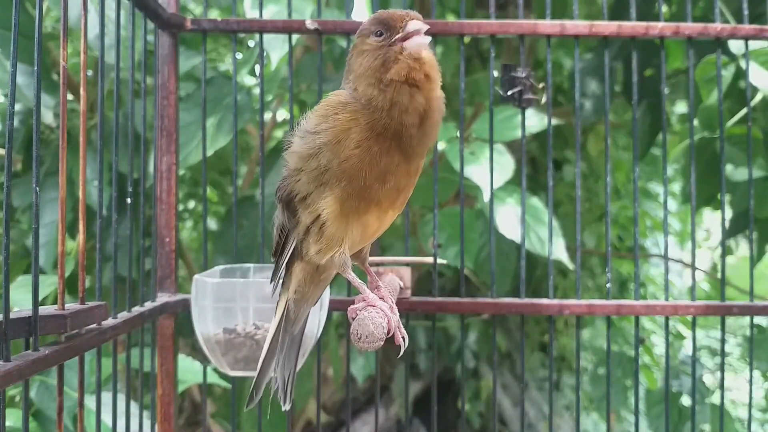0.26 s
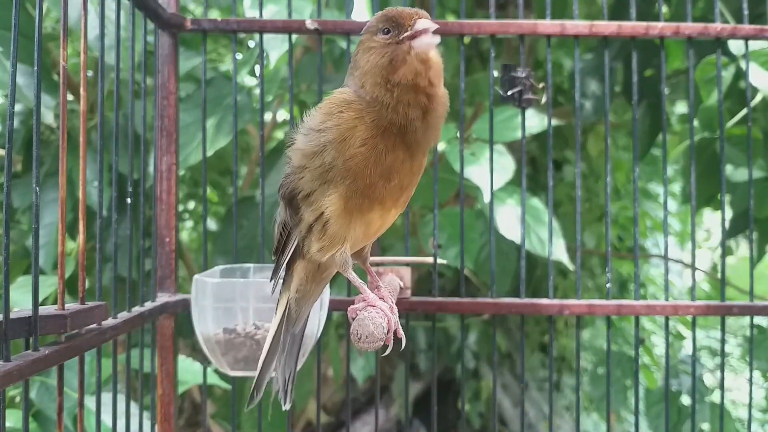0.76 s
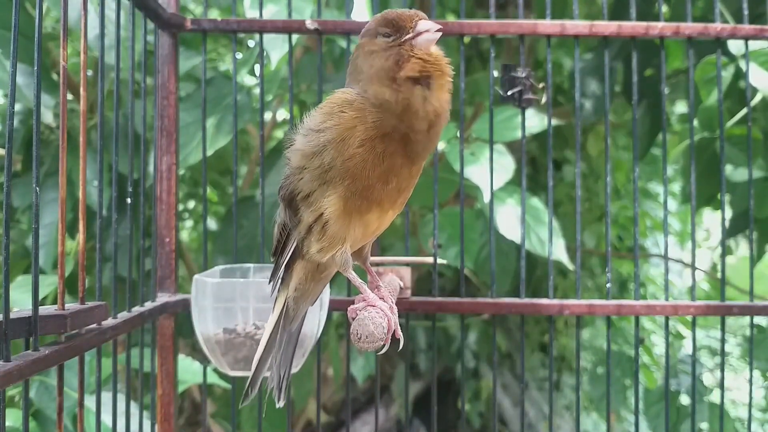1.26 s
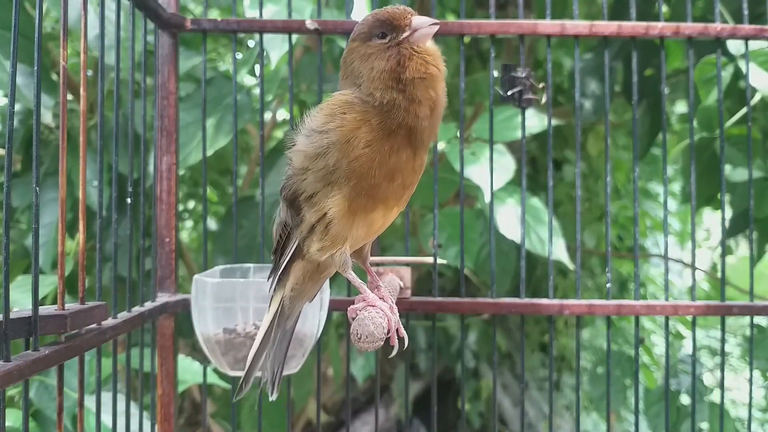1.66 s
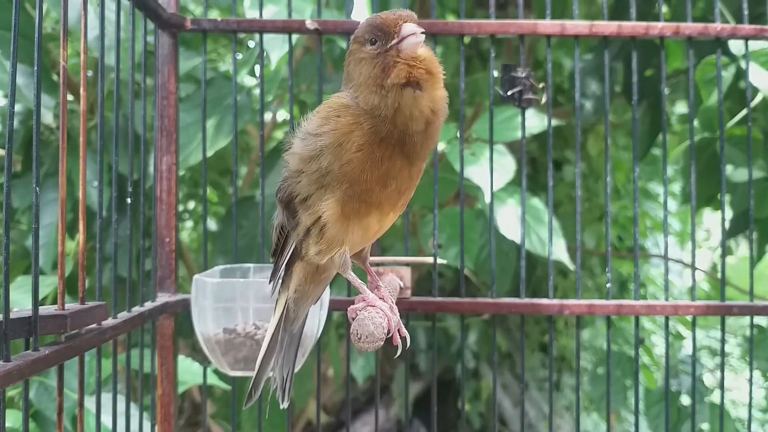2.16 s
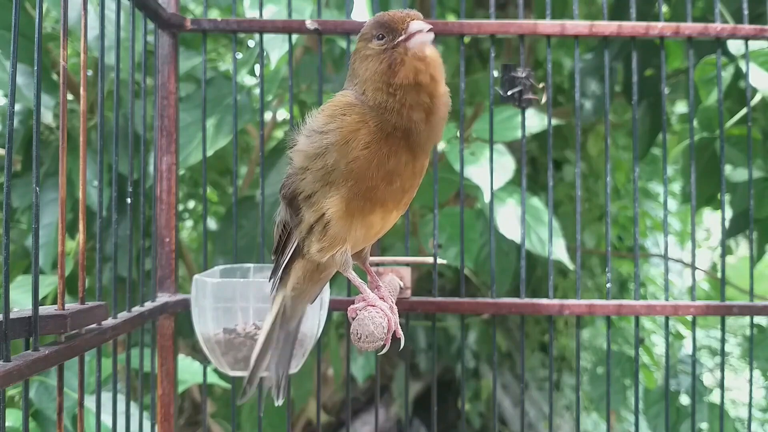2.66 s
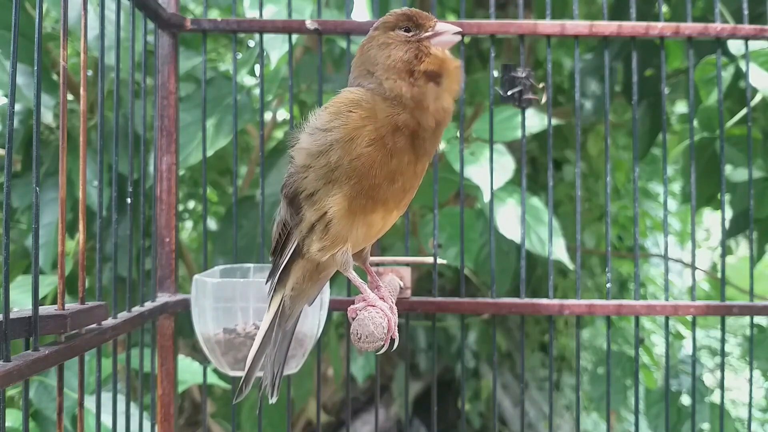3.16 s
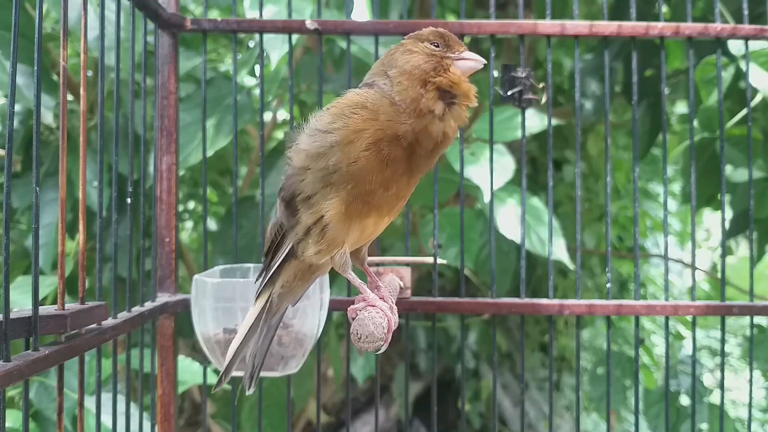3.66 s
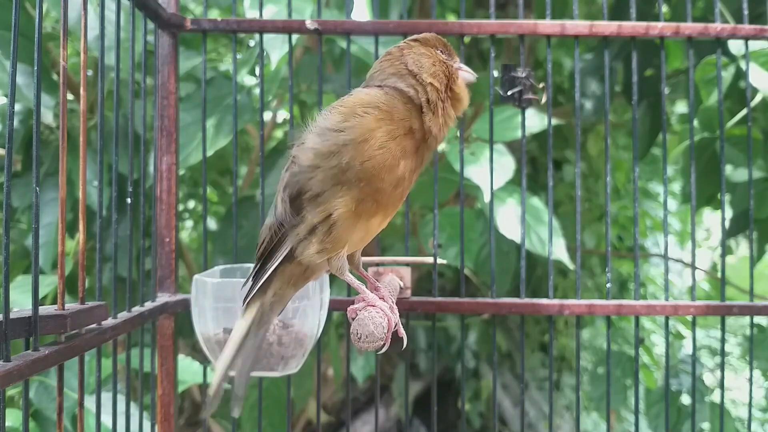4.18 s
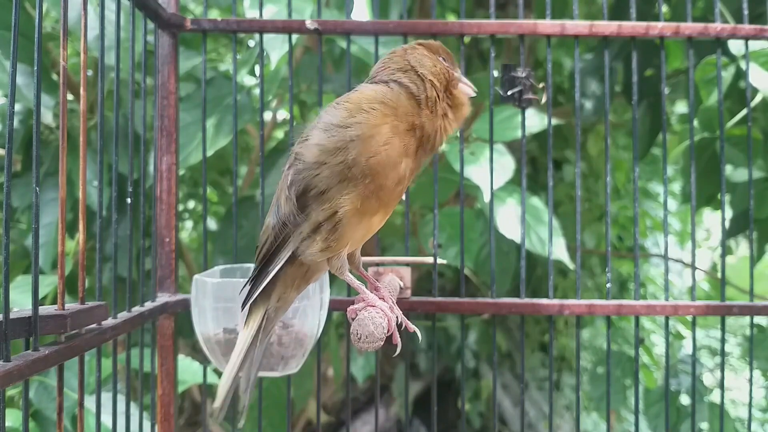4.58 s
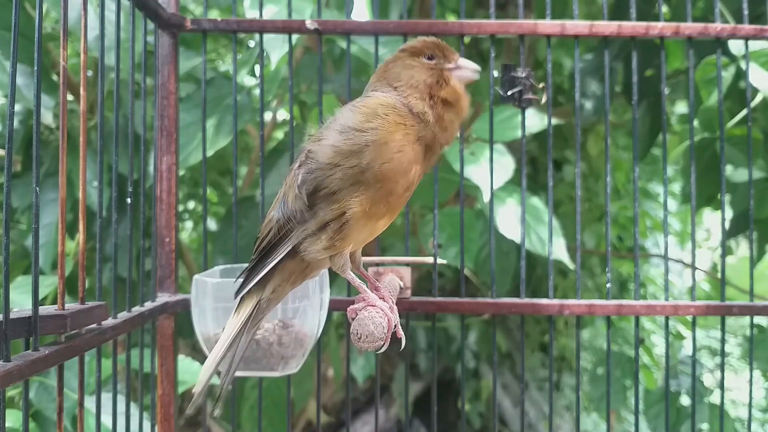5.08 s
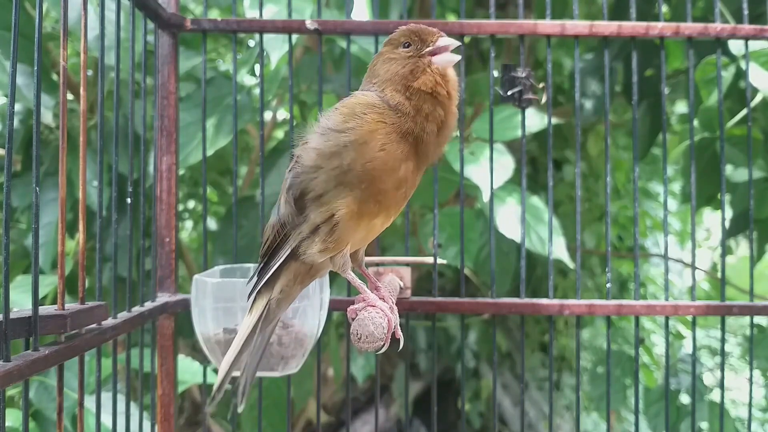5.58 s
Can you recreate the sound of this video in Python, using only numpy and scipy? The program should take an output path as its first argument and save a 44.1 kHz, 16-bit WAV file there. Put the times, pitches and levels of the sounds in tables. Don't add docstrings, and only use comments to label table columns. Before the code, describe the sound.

Close, bright, piercing birdsong from one canary: repeated whistles dropping quickly from high to a steady lower pitch, then two rapid trills of sharp falling chirps at about sixteen strokes per second, then six low-high pairs. Only tiny gaps separate the notes. The outdoor space has tight reflections from cage and walls; underneath are a quiet traffic wash, low engine pulses, and barely audible knocks and other birds. Peaks sound a little strained.

```python
import sys
import numpy as np
from scipy import signal
from scipy.fft import rfft, irfft, next_fast_len
from scipy.io import wavfile
from scipy.ndimage import uniform_filter1d, minimum_filter1d

SR = 44100
rng = np.random.default_rng(int(sys.argv[2]) if len(sys.argv) > 2 else 0)


def persist_wave(psi):
    counts = np.round(np.clip(psi, -1, 1) * 32767).astype(np.int16)
    wavfile.write(sys.argv[1], SR, np.atleast_2d(counts).T)


def how_loud(loudness_db):
    steps = np.asarray(loudness_db, float) / 20
    return 10 ** steps


N = 257103

# [t/s, level/dB]
STREET_LEVEL = [(0.0, -48), (0.03, -44), (0.57, -51.5), (0.62, -45), (1.33, -45), (1.54, -52.5),
                (1.64, -45.5), (3.95, -45.5), (4.09, -39), (4.45, -45.5), (5.39, -45.5), (5.41, -52.5),
                (5.75, -43), (5.83, -50.5)]
# [f/Hz, level/dB per Hz]
AIR_SPECTRUM = [(15, -56), (35, -31), (60, -14), (107, 2), (286, -7.5), (450, -13.5), (749, -24),
                (1350, -34), (2200, -35), (4000, -31), (6500, -38), (8800, -35), (12000, -51), (16000, -65)]
# [t of the loudest moment/s, level/dB, width/s]
ENGINE_THROBS = [(.13, -45, 0.34), (.68, -35, 0.063), (0.962, -29, 0.14), (1.279, -24, .09),
                 (1.652, -30.5, 0.11), (1.93, -31, 0.028), (2.089, -25.5, 0.051), (2.32, -32, 0.26),
                 (2.83, -31, 0.1), (3.15, -38.5, 0.27), (3.44, -34, 0.26), (3.73, -41, 0.044),
                 (3.92, -27.5, 0.12), (4.2, -49.5, 0.24), (4.611, -31.5, 0.088), (4.85, -42, 0.45),
                 (5.31, -29.5, .07), (5.72, -29.5, .15)]
# [t/s, length/s, f/Hz, level/dB]
FAR_KNOCKS = [
    (0.059, 0.084, 990, -48),
    (1.46, 0.11, 980, -51.5),
    (2.006, 0.14, 1060, -54.5),
    (4.383, 0.066, 960, -45),
    (4.701, 0.08, 1020, -49),
    (5.22, 0.11, 1040, -57.5),
]
# [delay/ms, gain]
EARLY_ECHOES = [(1.654, 0.16), (1.955, 0.09), (2.258, 0.08), (2.534, 0.14), (3.016, 0.19), (3.46, 0.17),
                (3.992, 0.16), (4.242, 0.1), (4.593, 0.09), (4.85, 0.08), (5.763, 0.09), (7.361, 0.06),
                (9.271, 0.09), (9.872, 0.05), (10.652, 0.04), (11.101, 0.05), (12.668, 0.04),
                (14.448, 0.05)]
# [t/s, length/s, start f/Hz, end f/Hz, level/dB]
FAR_SLIDES = [
    (2.07, .05, 3000, 4200, -42),
    (2.09, .04, 7200, 8400, -54),
    (1.52, .04, 4300, 3800, -44),
    (.485, .06, 5100, 3850, -43),
    (4.14, .07, 8200, 7800, -52),
    (4.06, .05, 4300, 3900, -42),
]
# [t/s, length/s, start f/Hz, end f/Hz, level/dB]
FAR_ARCHED_CALLS = [
    (3.06, .065, 4950, 4000, -46),
    (1.98, .07, 5050, 4500, -44),
    (2.42, .055, 5000, 4500, -44),
    (1.165, .11, 3700, 3400, -42),
    (.25, .04, 4700, 4300, -48),
]
# [t/s, f/Hz, level/dB]
FAR_MACHINE = [(1.5, 770, -76), (1.65, 755, -61), (1.8, 775, -82), (2.1, 763, -66), (2.3, 770, -64),
               (2.5, 760, -84)]
# [multiple of the pitch, level/dB]
VOICE_OVERTONES = [(2, -34), (3, -36.5), (4, -33)]
# [t/s, length/s, held f/Hz, slowness of the fall, level at the end of the hold/dB]
WHISTLES = [
    (.0004, 0.22, 3135, 0.86, -9.5),
    (0.2886, 0.22, 3140, 0.85, -10),
    (0.58, 0.24, 3696, 0.77, -7.5),
    (0.8646, 0.24, 3658, 0.95, -7),
    (1.171, 0.25, 3665, 0.87, -9),
    (1.4755, 0.26, 3628, 0.95, -10.5),
    (1.794, 0.27, 3621, .955, -5.5),
    (2.1203, 0.27, 3641, 0.96, -8),
    (2.4491, 0.26, 3588, 0.97, -8.5),
    (2.7737, 0.27, 3593, 1.026, -8.5),
]
# [t/s, share of the way from held pitch to top]
WHISTLE_RISE = [(0, .6), (.003, .83), (.006, .93), (.0115, .998)]
# [t/s, share of the way from held pitch to top]
WHISTLE_FALL = [(0, 1), (.008, .936), (.021, .74), (.06, .455), (.1, .165), (.12, .066), (.142, .023),
                (.17, .003), (.27, -.011)]
# [t after onset/s, level/dB, extra level of deeper whistles/dB]
WHISTLE_EFFORT = [(0, -19.5, -9), (.003, -20.5, 7), (.01, -12.5, -1.5), (0.028, -10, -8.5),
                  (0.068, -7.5, 2), (0.113, -10.5, -8), (0.153, -4, 0.5)]
# [t after onset/s, extra f/Hz]
DEEP_SETTLING = [(.1, 0), (.13, 135), (.16, 25), (.19, -55), (.24, 10)]
# [t/s, f/Hz, level/dB]
TRILL_OPENING = [(3.113, 5310, -21), (3.117, 6500, -29), (3.124, 7260, -38), (3.13, 6630, -22.5),
                 (3.138, 5040, -16.5), (3.144, 3870, -1), (3.152, 3190, -39), (3.164, 2590, -18),
                 (3.166, 2300, -48)]
# [t/s, slowness, chip level/dB, arc level/dB]
FIRST_TRILL = [(3.1824, 0.99, -18, -2.5), (3.245, 0.94, -13, -2), (3.3053, 0.92, -11.5, -1),
               (3.365, 0.91, -9, -1), (3.4249, 0.92, -10.5, -0.5), (3.4844, 0.99, -7.5, -1.5),
               (3.5474, 0.91, -18, 0), (3.6078, 0.94, -10.5, -2), (3.669, 1.02, -10.5, -.5),
               (3.732, .95, -7, -2), (3.7938, 0.99, -12, -1), (3.8575, 0.97, -10, 0),
               (3.92, 1.02, -11.5, -3.5), (3.9851, 1.046, -24.5, -2)]
# [t after onset/s, f/Hz, level/dB]
CHIP_SHAPE = [(-.001, 3500, -47), (.0008, 4000, -11.5), (.002, 4494, 11.5), (.0035, 5230, -9),
              (.006, 6120, -8)]
# [t after onset/s, f/Hz, level/dB]
ARC_SHAPE = [(.005, 5887, -47), (.0085, 6803, -27), (.013, 6450, -19), (.02, 5422, -12.5), (.03, 3920, -2),
             (.034, 3417, -14), (.039, 3238, -19), (.0445, 2850, -7.5), (.052, 2114, -31)]
# [t/s, slowness, start f/Hz, level/dB]
SECOND_TRILL = [(4.1016, 0.85, 6570, -4.5), (4.1604, 0.88, 6720, 1), (4.2204, 0.98, 6730, 0),
                (4.2785, 1.05, 6970, -0.5), (4.342, 0.96, 6940, -0.5), (4.403, 1.02, 6900, -1),
                (4.4651, 0.9, 6580, 0.5), (4.5247, 1, 6810, -.5), (4.5873, .97, 6980, 0.5),
                (4.6505, 0.92, 6840, -1.5), (4.7125, 1.02, 6640, -1), (4.7745, 1.11, 6930, -2)]
# [t after onset/s, share of the start pitch, level/dB]
STROKE_UPPER = [(0, 1.015, -30), (.002, 1.0, -17), (.008, .89, -14), (.016, .76, -23)]
# [t after onset/s, f/Hz, level/dB]
STROKE_LOWER = [(0.0208, 4724, -7.5), (.024, 4010, -0.5), (.027, 3526, -10), (.03, 3054, -20),
                (0.032, 3260, -38)]
# [t/s, low note level/dB, high note f/Hz, t of its loudest moment after onset/s, its level/dB]
CLOSING_PAIRS = [
    (4.845, -4, 6377, 0.099, -2.5),
    (5.017, -0.5, 6380, 0.11, -5.5),
    (5.187, 0.5, 6283, 0.12, -5.5),
    (5.358, 1, 6187, 0.12, -4.5),
    (5.527, 0.5, 6204, .116, -6),
    (5.701, 0.5, 6184, 0.12, -3),
]
# [t after onset/s, f/Hz, level/dB]
LOW_NOTE_SHAPE = [(0, 3260, -32), (.006, 3480, -14), (.012, 3610, -5.5), (.021, 3670, -6), (.033, 3680, -9),
                  (.05, 3650, -18), (.078, 3610, -24), (.088, 3600, -36)]
# [t after onset/s, f/Hz, level/dB]
HOARSE_VOICE = [(.025, 4100, -48), (.045, 4550, -41), (.07, 4700, -42), (.095, 4400, -50)]
# [t from 0.055 s after the pair's onset/s, f/Hz, level/dB]
RISE_TO_HIGH = [(-.024, 3900, -46), (-.016, 4350, -39), (-.007, 5050, -39), (0, 5700, -37)]
# [f off its pitch/Hz, level off its peak/dB]
HIGH_NOTE_SHAPE = [
    (-650, -30),
    (-260, -33.5),
    (-89.5, -8),
    (22, 2.5),
    (49, -23),
    (-170, 1),
]


def at_hz(points, hz):
    table = np.array(points)
    return np.interp(np.log(hz), np.log(table[:, 0]), table[:, 1])


def shaped(x, gain):
    size = next_fast_len(N + SR // 2)
    hz = np.arange(size // 2 + 1) * SR / size + 1e-3
    return irfft(rfft(x, size) * gain(hz), size)[..., :N]


def band(x, hz, kind, order=2):
    return signal.sosfilt(signal.butter(order, hz, kind, fs=SR, output="sos"), x)


def drift(rate):
    r = np.exp(-2 * np.pi * rate / SR)
    slow = signal.lfilter([1], [1, -2 * r, r * r], rng.standard_normal(N + SR))[SR:]
    return slow / slow.std()


def unsteady(depth, rate):
    breath = band(rng.standard_normal(N), 4000, "high")
    return np.array([depth * drift(rate), drift(570), drift(230), breath])


def add_note(out, s, hz, db, waver, fade_s=.002):
    at = np.arange(max(0, round(s[0] * SR)), min(N, round(s[-1] * SR)))
    t = at / SR
    pitch_waver, rasp, flutter, breath = waver[:, at]
    pitch = np.interp(t, s, hz) * (1 + pitch_waver)
    phase = 2 * np.pi * np.cumsum(uniform_filter1d(pitch, size=45)) / SR
    tone = (1 + how_loud(-34.5) * rasp) * np.sin(phase) + how_loud(-49) * breath
    closing_db = -.004 * np.maximum(pitch - 3900, 0)
    upper = 0
    for k, overtone_db in VOICE_OVERTONES:
        strength = how_loud(overtone_db + (k > 2) * closing_db)
        upper = upper + strength * (k * pitch < 16000) * np.sin(k * phase)
    tone += (1 + .45 * flutter) * upper
    edge = np.clip(np.minimum(t - s[0], s[-1] - t) / fade_s, 0, 1)
    out[at] += np.sqrt(2) * how_loud(np.interp(t, s, db)) * edge * tone


def engine():
    t = np.arange(N) / SR
    hum_hz = 84 + 3.0 * drift(5)
    hum = np.sin(2 * np.pi * np.cumsum(hum_hz) / SR) * how_loud(3.0 * drift(13))
    throb = how_loud(-58)
    for top, db, width in ENGINE_THROBS:
        throb = throb + how_loud(db) / np.cosh(2.15 * (t - top) / width)
    return throb * hum


def traffic():
    s, street_db = np.transpose(STREET_LEVEL)
    air = shaped(rng.standard_normal((2, N)), lambda hz: how_loud(at_hz(AIR_SPECTRUM, hz)))
    air /= band(air[0], [130, 600], "band").std()
    level_db = np.interp(np.arange(N) / SR, s, street_db) + 1.2 * drift(15) + 1.5 * drift(3)
    return how_loud(level_db) * (air[0] + how_loud(-44) * air[1] * [[1], [-1]])


def knocks():
    t = np.arange(N) / SR
    white, out = rng.standard_normal(N), np.zeros(N)
    for start, length, hz, db in FAR_KNOCKS:
        ring = band(white, [0.82 * hz, 0.98 * hz], "band", order=1)
        out += how_loud(db + 23) * ring * np.sin(np.pi * np.clip((t - start) / length, 0, 1))
    return out


def yard(x):
    def echo_gain(hz):
        return 1 + sum(g * np.exp(-2j * np.pi * hz * ms / 1000) for ms, g in EARLY_ECHOES)

    t = np.arange(SR // 2) / SR

    def tail(t60_s, db, end_s=1):
        decay = (t > .005) * (t < end_s) * how_loud(-60 * t / t60_s)
        return how_loud(db) * decay / np.sqrt(np.sum(decay ** 2))

    near = tail(0.089, -21, end_s=.016)
    walls, far = tail(0.15, -13), tail(0.92, -32.5)
    white = rng.standard_normal((2, len(t)))
    dull = band(white, 4500, "low")
    mid, side = signal.fftconvolve(x[None], (near + walls) * white + far * dull, axes=1)[:, :N]
    return shaped(x, echo_gain) + mid + how_loud(-16.0) * side * [[1], [-1]]


def far_birds():
    out, waver = np.zeros(N), unsteady(0.017, 80)
    for calls, arch_hz in ((FAR_SLIDES, 0), (FAR_ARCHED_CALLS, 470)):
        for s, length, start_hz, end_hz, db in calls:
            hz = [start_hz, (start_hz + end_hz) / 2 + arch_hz, end_hz]
            add_note(out, s + length * np.array([0, .5, 1]), hz, db + np.array([-4, 0, -5]), waver, .01)
    add_note(out, *np.transpose(FAR_MACHINE), waver)
    return out


def trill_breath():
    hiss = band(rng.standard_normal(N), (10800, 14500), "band")
    swell = np.interp(np.arange(N) / SR, (3.17, 3.25, 3.93, 4.03), [0, 1, 1, 0])
    return how_loud(-41 + 2.0 * drift(30)) * swell * hiss


def whistles(waver):
    lag, share = np.transpose(WHISTLE_FALL)
    rise, rise_share = np.transpose(WHISTLE_RISE)
    when, effort_db, deep_db = np.transpose(WHISTLE_EFFORT)
    top_hz, release_s, release_db = 6968, .017, -25
    out = np.zeros(N)
    for s, length, held_hz, slow, end_db in WHISTLES:
        t, deep = np.arange(0, length, .002), held_hz < 3400
        fall = .1 * length + slow * lag
        height = np.interp(t, np.r_[rise, fall], np.r_[rise_share, share])
        hz = held_hz + (top_hz - held_hz) * height + deep * np.interp(t, *np.transpose(DEEP_SETTLING))
        db = effort_db + deep * deep_db
        last = length - release_s
        hold_db = db[-1] - 1 + .25 * (end_db - db[-1])
        db_times = np.r_[when, (when[-1] + last) / 2, last, length]
        db = np.interp(t, db_times, np.r_[db, hold_db, end_db, release_db])
        add_note(out, s + t, hz, db, waver, .001)
    return out


def trills(waver):
    out = np.zeros(N)
    chance_db = 2.5
    chip, arc = np.transpose(CHIP_SHAPE), np.transpose(ARC_SHAPE)
    up, low = np.transpose(STROKE_UPPER), np.transpose(STROKE_LOWER)
    for s, slow, chip_db, arc_db in FIRST_TRILL:
        add_note(out, s + chip[0], chip[1], chip[2] + chip_db, waver, .0005)
        db = arc[2] + arc_db + rng.normal(0, chance_db, len(arc[2]))
        add_note(out, s + slow * arc[0], arc[1], db, waver, .001)
    for s, slow, start_hz, db in SECOND_TRILL:
        lag = np.r_[up[0], low[0]]
        hz = np.r_[up[1] * start_hz, low[1]]
        stroke_db = np.r_[up[2], low[2]] + db + rng.normal(0, chance_db / 2, len(lag))
        add_note(out, s + slow * lag, hz, stroke_db, waver, .001)
    return out


def closing_notes(waver):
    out = np.zeros(N)
    low, haze = np.transpose(LOW_NOTE_SHAPE), np.transpose(HOARSE_VOICE)
    off_hz, off_db = np.transpose(HIGH_NOTE_SHAPE)
    link = np.transpose(RISE_TO_HIGH)
    start_s, end_s = .05, .138
    for k, (s, low_db, high_hz, loudest, high_db) in enumerate(CLOSING_PAIRS):
        add_note(out, s + low[0], low[1], low[2] + low_db, waver, .003)
        add_note(out, s + haze[0], haze[1], haze[2], waver * [[14], [30], [1], [1]], .008)
        swell = start_s + (loudest - start_s) * np.array([0, .17, .45, 1])
        lag = np.r_[swell, loudest + .6 * (end_s - loudest), end_s]
        add_note(out, s + lag, high_hz + off_hz, high_db + off_db, waver, .004)
        if k > 0:
            add_note(out, s + .055 + link[0], link[1], link[2] - 5, waver * [[5], [12], [1], [1]])
    return out


def canary():
    opening, waver = np.zeros(N), unsteady(0.006, 180)
    add_note(opening, *np.transpose(TRILL_OPENING), waver, .004)
    husky = waver * [[1], [2.0], [1], [how_loud(15)]]
    return opening + whistles(waver) + trills(husky) + closing_notes(waver)


def scene():
    street = engine() + traffic() + knocks()
    return street + yard(far_birds() + canary()) + trill_breath()


def low_pass(x):
    return signal.sosfilt(signal.butter(12, 15800, fs=SR, output="sos"), x)


def record(dry):
    turn = 2 * np.pi * 3900 * np.arange(N) / SR
    ripple = how_loud(-27) * np.cos(turn) + how_loud(-40) * np.cos(2 * turn)
    below = band(band(dry, 5000, "high", order=1) * ripple, [900, 3300], "band", order=1)
    above = how_loud(-4) * band(band(dry, 5500, "high", order=3) * ripple, 8000, "high")
    bent = how_loud(-33.0) * band(dry ** 2, 9000, "high") * np.cos(turn)
    x = dry + below + above + bent
    limit = 1.0
    peaks = -minimum_filter1d(-np.abs(x).max(axis=0), size=31)
    crest = uniform_filter1d(peaks, size=21)
    x = x / (1 + (crest / (1.16 * limit)) ** 6) ** (1 / 6)
    x = np.clip(x, -limit, limit)
    x = signal.sosfilt(signal.cheby2(10, 50, 16000, fs=SR, output="sos"), x)
    return low_pass(x)


dry = scene()
out = record(dry)
persist_wave(out)
```